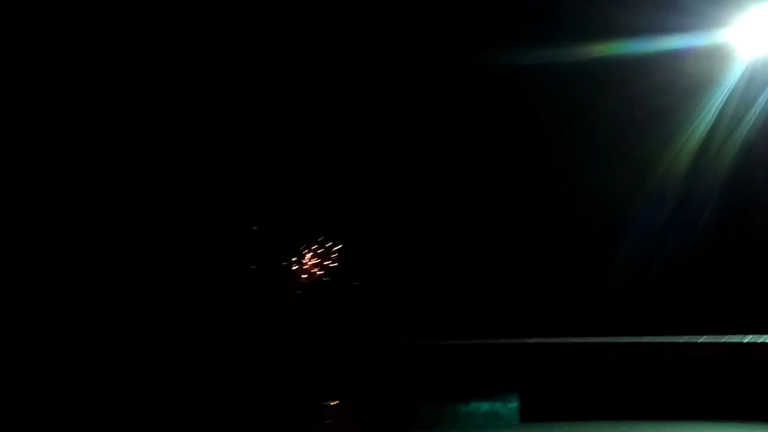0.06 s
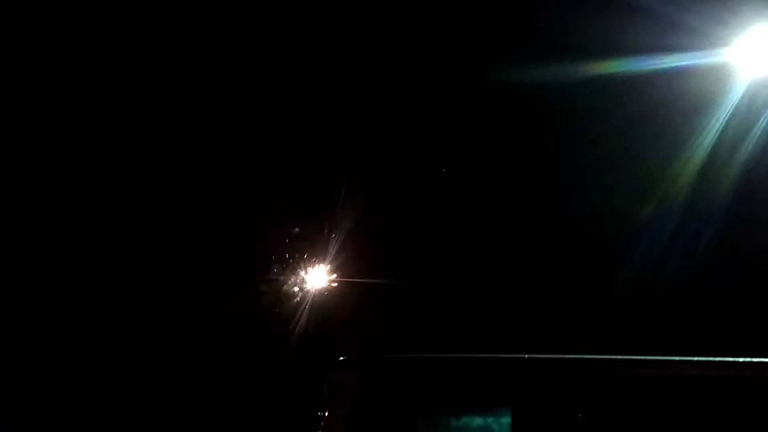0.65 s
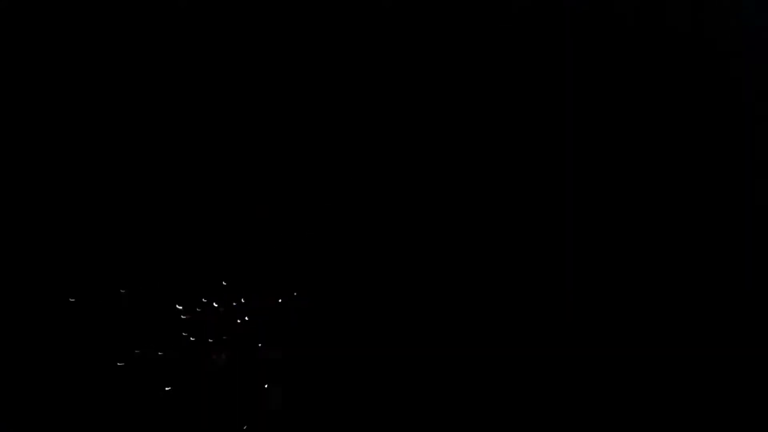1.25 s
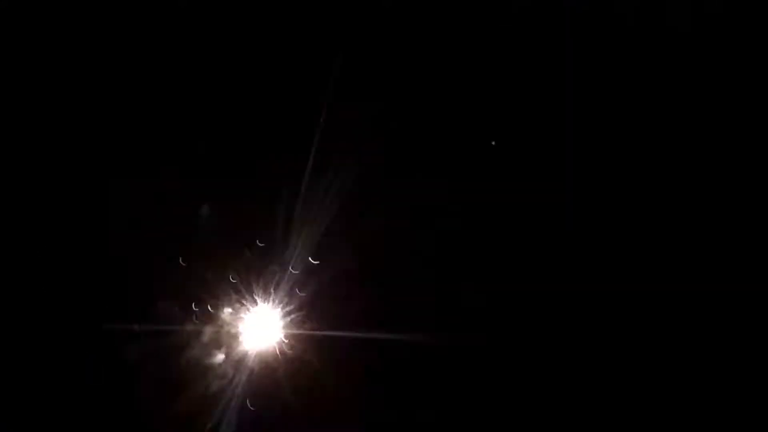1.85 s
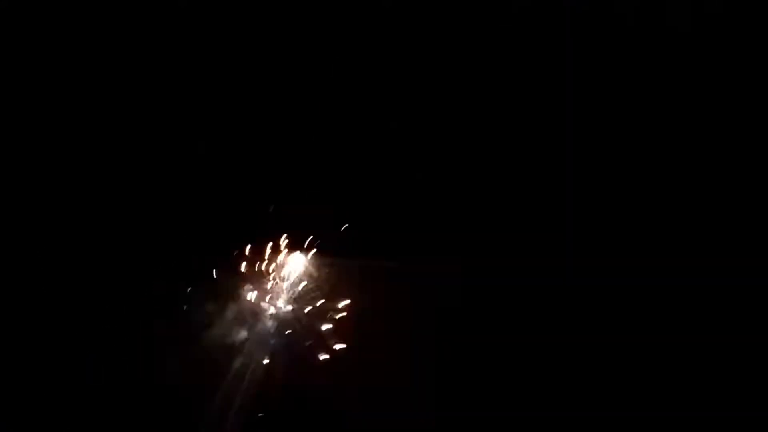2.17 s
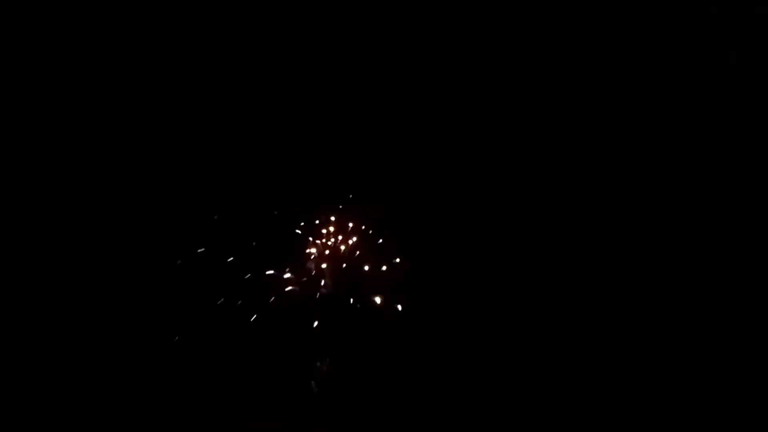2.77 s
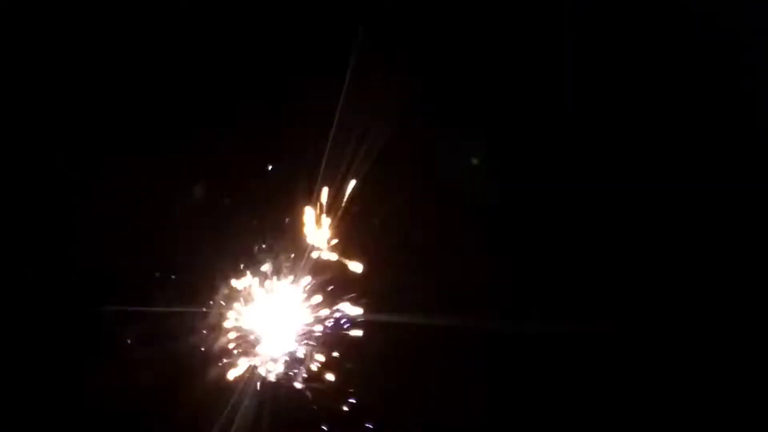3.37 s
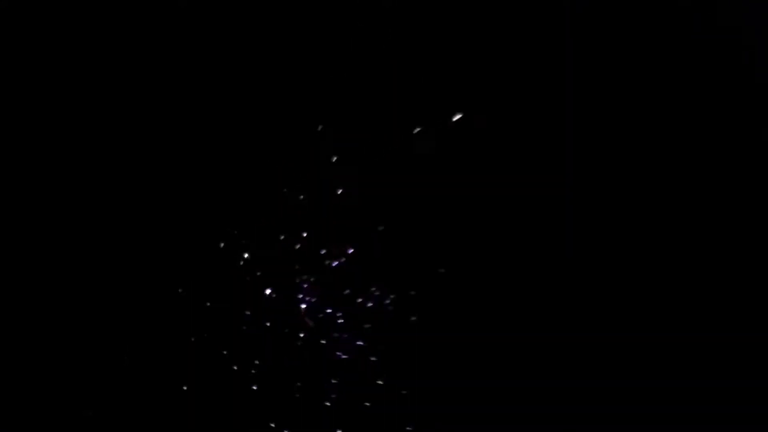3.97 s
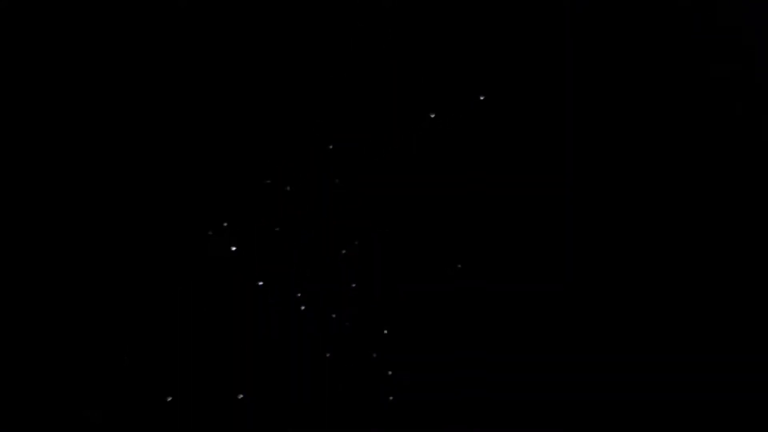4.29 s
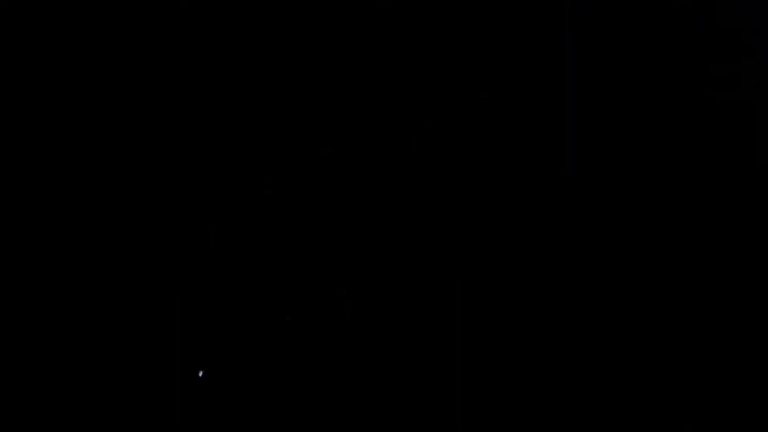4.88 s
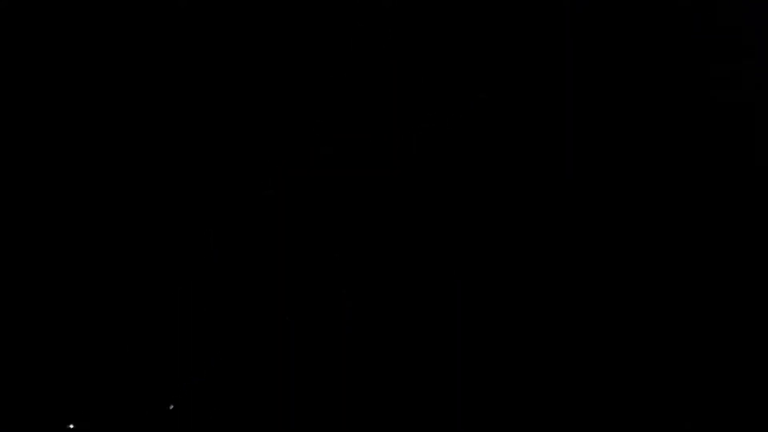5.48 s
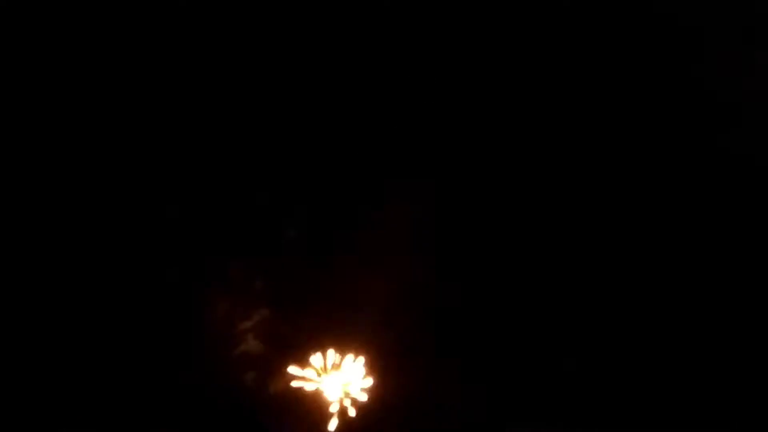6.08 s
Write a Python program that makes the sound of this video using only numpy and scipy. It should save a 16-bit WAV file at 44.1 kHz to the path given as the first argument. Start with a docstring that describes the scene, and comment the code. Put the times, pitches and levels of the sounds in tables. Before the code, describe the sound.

A small engine idles with a fast metallic clatter and low rumble throughout, under the steady hiss and sputter of burning firework powder in an open yard. Firecrackers start at about 0.3 seconds, with sharp, dry bangs at 0.7, 1.1, 1.2, 1.8, 2.4, 2.8 and 3 seconds; the one at 1.1 is the hardest, with a bright crack and a low thump. Each leaves a short echo and a thin slap from a far wall. From 3.4 seconds comes a rapid flurry of about ten slightly smaller pops, ending with a firm bang at 3.9. Distant fireworks thud faintly around 1.4, 1.7 and 4.6 seconds. The bangs push the background down; after they stop, the engine's clatter and the sputtering hiss gradually swell, the powder flaring up until the end at about 6 seconds.

```python
"""A small engine idles under the hiss of burning powder; then firecrackers go off one after another.
Each is a pressure pulse that the ground and walls of the night-time yard throw back.
Other fireworks thud far away. The bangs hold the recorder's gain down; when they stop
it creeps up, and the engine's clatter and the sputtering hiss swell."""
import sys
import numpy as np
from scipy import signal
from scipy.fft import rfft, irfft
from scipy.io import wavfile
from scipy.ndimage import uniform_filter1d, minimum_filter1d

SR = 44100
rng = np.random.default_rng(int(sys.argv[2]) if len(sys.argv) > 2 else 0)


def inscribe(sig):
    """Save sig as 16-bit PCM at rate SR to the path in sys.argv[1].

    A 1-D sig is mono; a 2-D sig holds one channel per row.
    Samples are clipped to [-1, 1] before scaling.
    """
    pcm = np.round(np.clip(np.atleast_2d(sig).T, -1, 1) * 32767)
    wavfile.write(sys.argv[1], SR, pcm.astype(np.int16))


N = 275625

# noise spectra of the fizzing powder and its bursting grains: f/Hz, level/dB
HISS_SPECTRUM = [(500, -17), (2000, 3), (4500, -3.5), (8000, -13.5), (11000, -20), (15500, -25)]
SPUTTER_SPECTRUM = [(300, -9), (1400, 5.5), (4000, -3.5), (9000, -28.5)]
# fierceness of the burn, sinking after the volley and flaring at the end: t/s, level/dB
BURN_LEVEL = [(0, 0.5), (1.5, 2.5), (2.8, 3.5), (4.2, -1), (5.2, -1), (6.2, 2.5)]
# noise spectra of the engine's loose metal and exhaust puffs: f/Hz, level/dB
CLATTER_SPECTRUM = [(200, -26), (600, -5.5), (740, 8), (930, 5.5), (1150, -4.5), (1400, 1.5), (1750, 2),
                    (2500, -0.5), (3300, -10.5), (4100, -6.5), (5200, -26.5), (6100, -13), (8000, -88),
                    (15000, -40)]
RUMBLE_SPECTRUM = [(20, -49), (40, -35), (70, -14.5), (150, 1.5), (310, 5.5), (450, 8), (600, 6.5),
                   (800, -15.5), (1100, -9), (2500, -13), (8000, -72)]
# exhaust hum: multiple of the firing rate, level/dB, left minus right/dB
EXHAUST_HARMONICS = [(2, -61.5, -12), (3, -53.5, -6.5), (4, -54, 15.5), (5, -54, -1), (6, -49.5, -9.5),
                     (9, -49, -15.5)]
# far fireworks: t/s, level/dB, f/Hz, T60/s
FAR_THUDS = [(1.39, -16.5, 183, 0.28), (1.681, -8.5, 193, 0.11), (4.586, -16, 162, 0.13)]
# short low thumps, opposite in sign on the two sides: t/s, level/dB, time constant/ms
LOW_THUMPS = [(.545, -6, 1.6), (1.0578, 21.5, 0.71)]
# the string of crackers hops about, so its slap off the far wall comes and goes: t/s, level/dB
WALL_SLAP_LEVEL = [(.3, -12), (1.1, -13), (1.9, -14), (2.8, -5.5), (3.4, -4.5), (3.9, -16)]
# faint sharp ticks, some just after a bang: t/s, level/dB
FAINT_TICKS = [(0.5424, -4), (2.9876, -2), (2.994, -3), (3.647, -13)]
# firecrackers: t/s, level/dB, overpressure duration/ms, treble crack/dB
CRACKER_BANGS = [(.3176, 15, .38, 1), (.743, 18.5, .24, -4), (1.056, 22.5, 0.65, 16),
                 (1.2133, 22, 0.27, 6.5), (1.8486, 22.5, .25, 0.5), (2.4095, 23, .25, -2),
                 (2.7565, 21.5, 0.5, 10), (2.963, 19, .32, -7.5), (3.3876, 18, 0.2, 2.5),
                 (3.389, 14, 0.16, 12), (3.427, 14.5, 0.13, 1.5), (3.4323, 12, 0.45, 7),
                 (3.5351, 15.5, 0.28, 9.5), (3.6551, 14, 0.29, 2), (3.664, 14, 0.31, 2),
                 (3.6965, 10.5, .33, 7.5), (3.7955, 12, 0.49, -2.5), (3.919, 19.5, 0.32, 6)]
# colour of a blast at the microphone: f/Hz, level/dB
BLAST_COLOUR = [(30, -7.5), (100, -14.5), (180, -6), (290, 0), (430, 3), (660, 4), (900, 2), (1200, -1.5),
                (1700, -3.5), (2600, -1.5), (4000, -8.5), (6500, -16.5), (8500, -24), (15000, -27)]
# imbalance of a blast between the sides: f/Hz, left minus right/dB
BLAST_BALANCE = [(150, -1.5), (300, 6.5), (500, 7.5), (700, 4), (1000, 3), (1350, 2.5), (2000, 1)]
# reflections from the ground and things nearby: delay/ms, level/dB
NEAR_ECHOES = [(3.05, -14), (4.47, -20), (7.3, -22), (18.5, -33), (25.5, -27), (67.5, -32.5), (83, -40)]
# spectrum of the yard's reverberation: f/Hz, level/dB
TAIL_SPECTRUM = [(100, -10.5), (350, 0), (700, -5.5), (1500, -14), (3000, 0.5), (6000, -3), (12000, -10.5)]
# its decay time: f/Hz, T60/s
TAIL_DECAY = [(150, 1), (500, 0.76), (2000, 0.33), (8000, 0.63)]


def gain_of(db):
    """Amplitude ratio of a level in decibels."""
    return 10 ** (np.asarray(db) / 20)


def unit_rms(x):
    """Normalisation to rms 1."""
    return x / np.sqrt(np.mean(x ** 2) + 1e-20)


def curve_at(points, hz):
    """Interpolation of (f/Hz, value) points on a log-frequency axis."""
    f, value = np.transpose(points)
    return np.interp(np.log(hz + 1), np.log(f + 1), value)


def add(mix, s, sound):
    """Superposition: a sound joins the mix at time s."""
    part = mix[..., round(s * SR):][..., :sound.shape[-1]]
    part += sound[..., :part.shape[-1]]


def pan(db):
    """Level difference as a left and a right gain."""
    return gain_of(np.array([[.5], [-.5]]) * db)


def minimum_phase(db):
    """Minimum phase: the spectrum of the promptest filter with this gain curve."""
    log_gain = np.log(gain_of(db))
    mirrored = np.concatenate([log_gain, log_gain[-2:0:-1]])
    return np.exp(np.conj(signal.hilbert(mirrored)))[:len(db)]


def coloured(x, spectrum):
    """Spectral shaping of a noise, at rms 1."""
    gain = gain_of(curve_at(spectrum, np.fft.rfftfreq(N, 1 / SR)))
    return unit_rms(irfft(rfft(x) * gain, N))


def scatter(t):
    """Scattering: sparse arrivals of random sign, nearly alike at the two sides."""
    taps = rng.choice([-1., 1.], (3, len(t))) * (rng.random((3, len(t))) < .25)
    return taps[0] + .25 * taps[1:]


def blast_waves(rows, crack_hz=1900, top_hz=8000, size=4096):
    """Friedlander wave: each blast is a jump of pressure followed by a longer suction."""
    hz, out = np.fft.rfftfreq(size, 1 / SR), np.zeros((2, N))
    # the steeper the shock front, the more the very top gains
    treble = hz ** 2 / (hz ** 2 + crack_hz ** 2) + 0.26 * hz ** 4 / (hz ** 4 + top_hz ** 4)
    balance_db = curve_at(BLAST_BALANCE, hz)
    for s, db, length_ms, crack_db in rows:
        jw_tau = 2j * np.pi * hz * length_ms / 1000
        pulse = jw_tau / (1 + jw_tau) ** 2  # spectrum of (1 - u) exp(-u), u = t / length
        colour_db = curve_at(BLAST_COLOUR, hz) + crack_db * treble
        wave = irfft([pulse * minimum_phase(colour_db + side * balance_db) for side in (.5, -.5)])
        add(out, s, gain_of(db) * wave[:, :size // 4] / abs(wave).max())
    return out


def hiss(level_db=-44, width=0.065):
    """Broadband noise: burning powder fizzes steadily."""
    noise = rng.standard_normal(N) + width * rng.standard_normal((2, N))
    return gain_of(level_db) * coloured(noise, HISS_SPECTRUM)


def sputter(grains_per_s=250, level_db=-43.5, spread_db=3.5):
    """Poisson process: grains of powder burst at random, most tiny, a few larger."""
    size = gain_of(spread_db * np.minimum(rng.exponential(1, N), 4))
    bursts = size * rng.choice([-1., 1.], N) * (rng.random(N) < grains_per_s / SR)
    return gain_of(level_db) * coloured(bursts, SPUTTER_SPECTRUM)


def flame(sputter_exponent=3.2):
    """Combustion noise: a fiercer burn hisses more, and its sputter grows faster still."""
    burn_db = np.interp(np.arange(N) / SR, *np.transpose(BURN_LEVEL))
    return gain_of(burn_db) * hiss() + gain_of(sputter_exponent * burn_db) * sputter()


def engine(firing_hz=27.665, clatter_db=-30, rumble_db=-33, uneven_db=2, knock=0.89, throb=0.26):
    """Periodic excitation: each firing of one cylinder shakes loose metal and puffs out exhaust."""
    cycles = firing_hz * np.arange(N) / SR + .85
    strength = gain_of(uneven_db * rng.standard_normal(int(cycles[-1]) + 1))[cycles.astype(int)]
    age = cycles % 1 / 0.16  # the shake peaks 0.16 cycles after a firing
    shake = strength * age * np.exp(1 - age)
    flicker = gain_of(-unit_rms(uniform_filter1d(rng.standard_normal(N), size=90)))
    rattle = rng.standard_normal(N) + 0.29 * rng.standard_normal((2, N))
    clatter = coloured(rattle * flicker * (1 + knock * shake), CLATTER_SPECTRUM)
    puffs = rng.standard_normal(N) + 0.77 * rng.standard_normal((2, N))
    rumble = coloured(puffs * (1 + throb * shake), RUMBLE_SPECTRUM)
    hum = sum(gain_of(db) * pan(pan_db) * np.sqrt(2) * np.sin(2 * np.pi * (k * cycles + rng.random()))
              for k, db, pan_db in EXHAUST_HARMONICS)
    return gain_of(clatter_db) * clatter + gain_of(rumble_db) * rumble + hum


def far_fireworks(rise_s=0.0056, octaves=0.6):
    """Attenuation with distance leaves only a soft low boom of each firework."""
    t, out = np.arange(SR) / SR, np.zeros((2, N))
    for s, db, pitch_hz, t60 in FAR_THUDS:
        band = signal.butter(2, [pitch_hz / 2 ** octaves, pitch_hz * 2 ** octaves], "band", fs=SR)
        envelope = (1 - np.exp(-t / rise_s)) * gain_of(-60 * t / t60)
        boom = signal.lfilter(*band, scatter(t) * envelope)
        add(out, s, gain_of(db) * boom / abs(boom).max())
    return out


def low_thumps():
    """Antiphase: short low thumps, opposite in sign on the two sides."""
    out = np.zeros(N)
    for s, db, tau_ms in LOW_THUMPS:
        age = np.arange(SR // 10) / SR * 1000 / tau_ms
        add(out, s, gain_of(db) * age * (2 - age) * np.exp(-age))
    return np.array([out, -out])


def far_wall(delay_s=.1126, length_ms=0.068, treble_db=5, air_hz=5500, boost_db=3):
    """Echo: a distant wall returns each bang as a thin slap; air absorption takes off the top."""
    slaps = blast_waves([(s + delay_s, np.interp(s, *np.transpose(WALL_SLAP_LEVEL)), length_ms, treble_db)
                         for s, *_ in CRACKER_BANGS])
    return gain_of(boost_db) * signal.lfilter(*signal.butter(2, air_hz, fs=SR), slaps)


def faint_ticks(length_ms=0.08, treble_db=9):
    """A short pulse has a wide spectrum: faint sharp ticks, some just after a bang."""
    return blast_waves([(s, db, length_ms, treble_db) for s, db in FAINT_TICKS])


def firecrackers():
    """Sudden expansion launches a shock wave; a clean burst has a sharper crack."""
    return blast_waves(CRACKER_BANGS)


def with_echoes(x):
    """Early reflections: the ground and nearby things add delayed copies to the direct sound."""
    echoes = np.zeros(SR)
    for delay_ms, db in NEAR_ECHOES:
        add(echoes, delay_ms / 1000, gain_of([db]))
    return x + signal.fftconvolve(x, echoes[None], axes=1)[:, :N]


def yard(x, near_db=-13, edges_db=-5, tail_db=-17, near_t60=0.081, drift_s=1.7):
    """Reverberation: single echoes, quick scatter off nearby things, a long tail between the houses."""
    t, out = np.arange(SR) / SR, with_echoes(x)
    treble_band = signal.butter(2, [1700, 11000], "band", fs=SR)
    for k in range(3):
        near = scatter(t) * gain_of(-60 * t / near_t60) * (t > .0015)
        # small edges return only the treble, in a cluster a few milliseconds long
        edges = signal.lfilter(*treble_band, scatter(t) * np.exp(-((t - 0.0024) / 0.004) ** 2))
        hz, age, bands = signal.stft(scatter(t), SR, nperseg=256)
        hz = hz[:, None]
        bands *= gain_of(curve_at(TAIL_SPECTRUM, hz) - 60 * age / curve_at(TAIL_DECAY, hz))
        tail = signal.istft(bands, SR, nperseg=256)[1][:, :SR] * (1 - np.exp(-t / 0.001))
        paths = sum(gain_of(db) * path / np.linalg.norm(path[0])
                    for db, path in ((near_db, near), (edges_db, edges), (tail_db, tail)))
        # the crackers jump about, so the blend of three sets of paths changes from bang to bang
        share = np.sqrt(2 / 3) * np.cos(2 * np.pi * (np.arange(N) / SR / drift_s + k / 3))
        out += signal.fftconvolve(x * share, paths, axes=1)[:, :N]
    return out


def scene():
    """Superposition of the bangs and their echoes on the steady sounds of the yard."""
    blasts = firecrackers() + faint_ticks() + far_wall()
    return yard(blasts) + low_thumps() + far_fireworks() + with_echoes(engine() + flame())


def widened(x, split_hz=950, delay_s=1 / 1800):
    """Phase difference widens the recorder's stereo: the left treble comes inverted and late."""
    hz = np.fft.rfftfreq(N, 1 / SR)
    inverted_delay = -np.exp(-2j * np.pi * hz * delay_s)
    # a crossover whose two halves stay in phase
    low, high = (signal.freqz(*signal.butter(2, split_hz, kind, fs=SR), hz, fs=SR)[1] ** 2
                 for kind in ("low", "high"))
    return irfft(rfft(x) * np.array([low + inverted_delay * high, low + high]), N)


def record(dry, ceiling_db=-0.5, start_cut_db=16.5, hold_s=0.1, recovery_db_per_s=7.0, top_hz=15800):
    """Automatic gain control: fast attack, hold, slow recovery; then clipping and a band limit."""
    wide = widened(dry)
    peak_db = 20 * np.log10(-minimum_filter1d(-abs(wide).max(0), size=64) + 1e-9)
    half_hold = int(hold_s * SR / 2)
    held_db = -minimum_filter1d(-peak_db, size=2 * half_hold + 1, origin=half_hold)
    recovery_db = recovery_db_per_s * np.arange(N) / SR
    deepest_db = np.maximum.accumulate(held_db - ceiling_db + recovery_db)
    cut_db = np.maximum(deepest_db, start_cut_db) - recovery_db
    ducked = wide / gain_of(uniform_filter1d(np.maximum(cut_db, 0), size=48))
    low_pass = signal.firwin(255, top_hz, window=("kaiser", 9), fs=SR)
    return signal.oaconvolve(np.clip(ducked, -1, 1), low_pass[None], "same")


dry = scene()
out = record(dry)
inscribe(out)
```